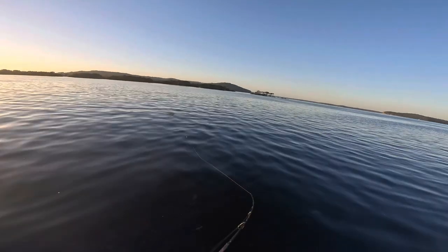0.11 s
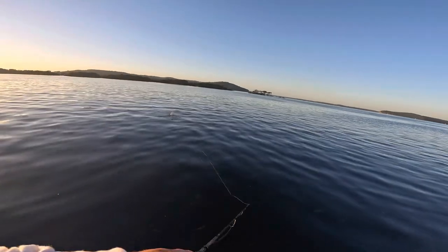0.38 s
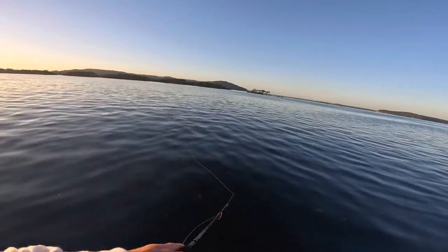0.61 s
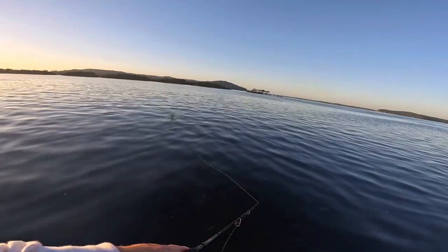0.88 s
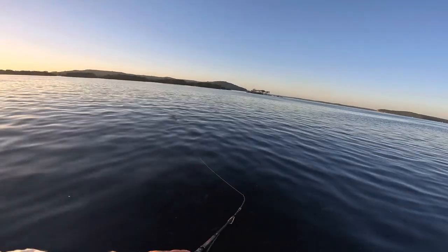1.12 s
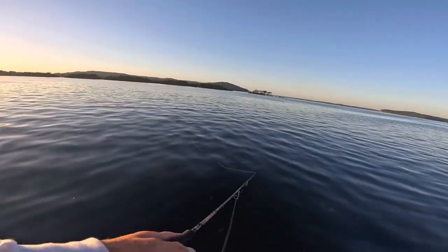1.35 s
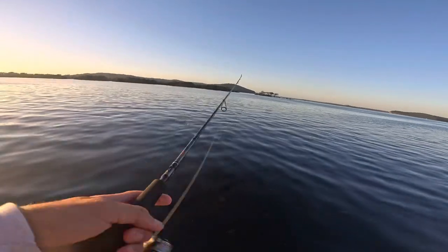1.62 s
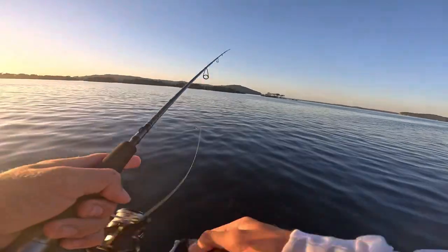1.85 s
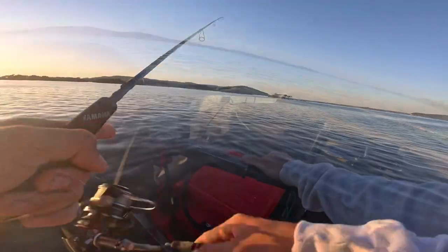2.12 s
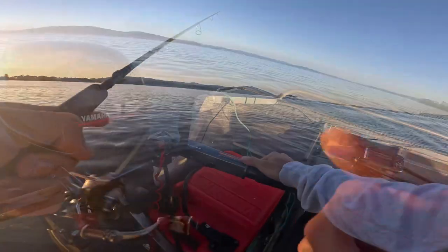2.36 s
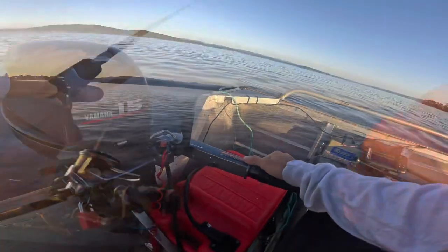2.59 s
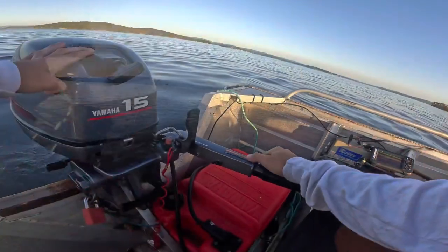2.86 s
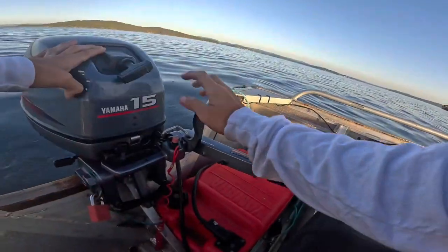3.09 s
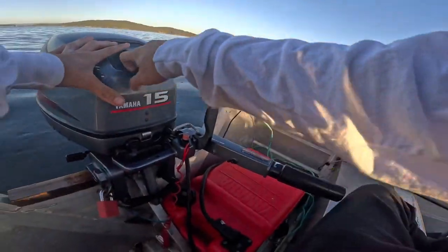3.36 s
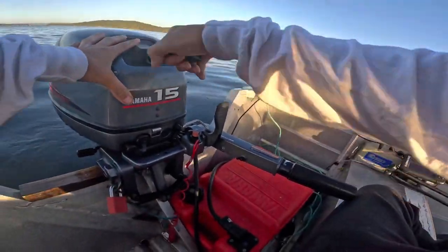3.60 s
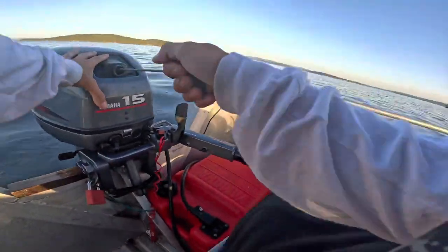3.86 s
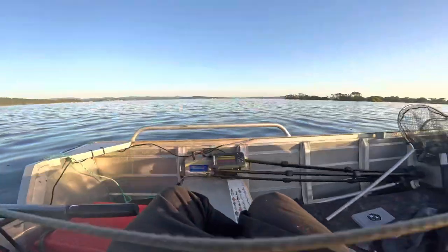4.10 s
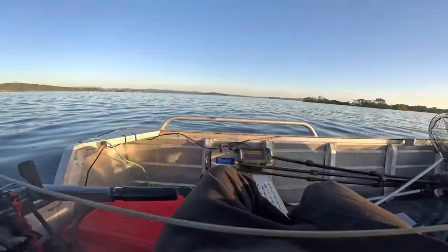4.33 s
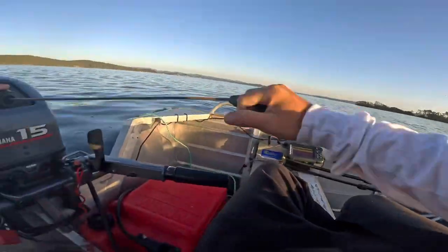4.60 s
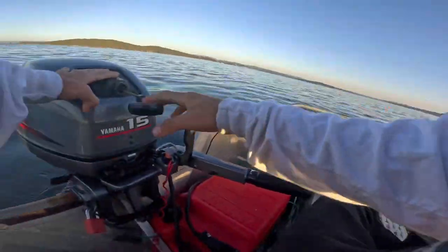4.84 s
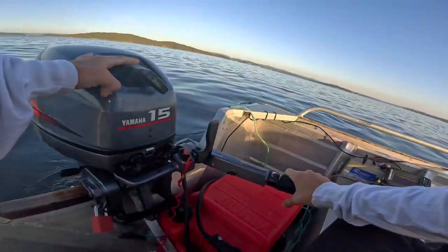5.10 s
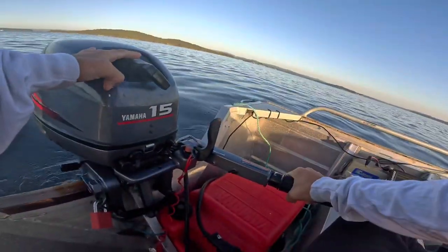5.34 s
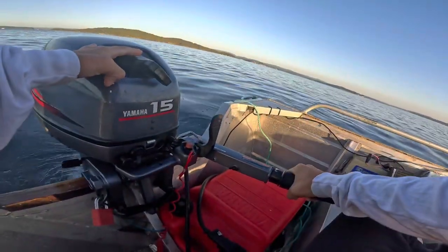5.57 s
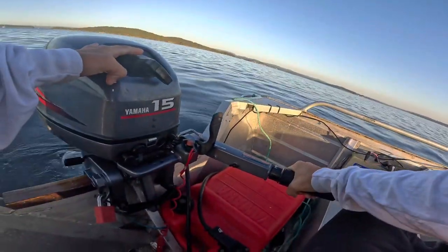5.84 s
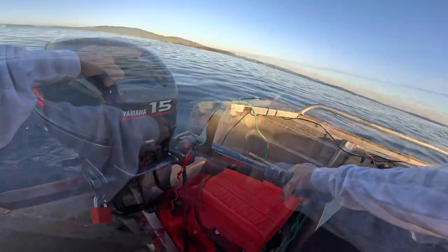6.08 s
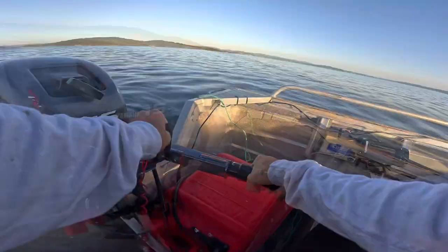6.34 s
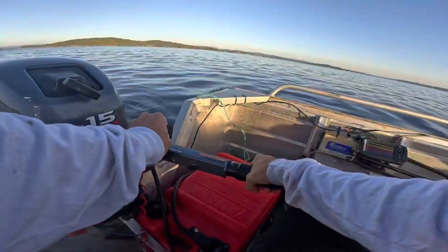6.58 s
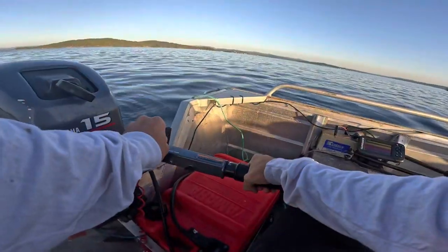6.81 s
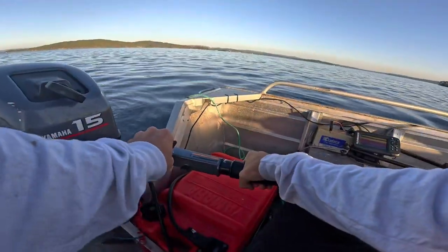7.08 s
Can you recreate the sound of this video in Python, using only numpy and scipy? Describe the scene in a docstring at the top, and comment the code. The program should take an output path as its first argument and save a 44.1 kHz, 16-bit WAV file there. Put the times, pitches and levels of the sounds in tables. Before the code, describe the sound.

Soft lapping and tackle clicks give way to a whirring starter cord and a two-stroke outboard catching, running up, settling to idle, with a final gear snap.

```python
"""A small open boat on a calm lake: noise rumbles, sleeves rustle, tackle ticks, air pockets plop at the hull.
A hand knocks on the cowl and pulls the starter cord; a two-cylinder two-stroke outboard catches,
runs up, eases off, then is heard idling. Friction and knocks are shaped noise, plops are decaying sines.
Gulps of air ring the intake's gliding resonances; noise makes the clatter, crank multiples the exhaust."""
import sys
import numpy as np
from scipy import signal
from scipy.fft import rfft, irfft
from scipy.io import wavfile

SR = 44100
rng = np.random.default_rng(int(sys.argv[2]) if len(sys.argv) > 2 else 0)


def invert_db(x):
    """Field ratio 10**(x/20) for x, a level in decibels (scalar or array-like)."""
    u = np.asarray(x, float) / 20
    return 10 ** u


def generate_wav(signal):
    """Clip the signal to [-1, 1] and save it as 16-bit WAV at the path in sys.argv[1]."""
    frames = np.transpose(np.atleast_2d(signal))
    scaled = np.clip(frames, -1, 1) * 32767
    pcm = np.round(scaled).astype(np.int16)
    wavfile.write(sys.argv[1], SR, pcm)


N = 317520


def rms_one(x):
    """Scales to rms 1."""
    return x / np.sqrt(np.mean(np.abs(x) ** 2) + 1e-20)


def in_time(rows):
    """Columns of a table after its seconds, interpolated to one value a sample."""
    s, *columns = np.transpose(rows)
    return [np.interp(np.arange(N) / SR, s, column) for column in columns]


def coloured(x, points, peaks=()):
    """Filters by a (Hz, dB) spectrum with (Hz, width Hz, dB) resonances on top."""
    hz = np.maximum(np.fft.rfftfreq(N, 1 / SR), 1)
    point_hz, point_db = np.transpose(points)
    base = invert_db(np.interp(np.log(hz), np.log(point_hz), point_db))
    boost = sum(invert_db(top_db) / (1 + (2 * (hz - at_hz) / width) ** 2) for at_hz, width, top_db in peaks)
    return irfft(rfft(x) * base * (1 + boost), N)


def drift(corner_hz):
    """Slow chance of spread 1: noise through two equal low-pass poles, computed every 40 samples."""
    r = np.exp(-2 * np.pi * corner_hz * 40 / SR)
    noise = rng.standard_normal(N // 40 + 2002)
    slow = signal.lfilter([1], [1, -2 * r, r * r], noise)[2000:]   # settled part
    return np.interp(np.arange(N) / 40, np.arange(len(slow)), rms_one(slow))


def ping(clicks, hz):
    """Clicks ring a two-pole resonance, down 60 dB in thirty cycles."""
    r, w = invert_db(-2 * hz / SR), 2 * np.pi * hz / SR
    return signal.lfilter([np.sin(w)], [1, -2 * r * np.cos(w), r * r], clicks + 1e-18)


# Rumble spectrum. Each row: Hz, density in dB per Hz.
RUMBLE_COLOUR = [(20, 1), (45, -1.5), (110, 1), (300, -9.5), (460, -22.5), (800, -60)]
# Gusts and jolts on the microphone. Each row: peak in seconds, level in dB, half length in seconds.
GUSTS = [(2.413, -38.5, 0.21), (2.86, -30.5, 0.018), (3.145, -35, 0.029), (4.347, -20.5, 0.37),
         (5.214, -18.5, 0.31), (7.04, -20, 0.12)]
CALM_AIR_DB = -41.5
BUFFET_DB, BUFFET_HZ, BUFFET_ENDS_S = -42.5, 45, 3   # deep buffeting early on
# hull level at mean exhaust level, share of the exhaust's dB swing, low edge
HULL_DB, HULL_FOLLOWS, HULL_CUT_HZ = -30, 0.75, 42


def rumble():
    """Low lumpy noise: air on the microphone, and the hull shaken by the exhaust."""
    t = np.arange(N) / SR
    gust_power = sum(invert_db(2 * db) * np.exp(-2 * ((t - s) / half_s) ** 2) for s, db, half_s in GUSTS)
    air_gain = np.sqrt(invert_db(2 * CALM_AIR_DB) + gust_power)
    exhaust_db = engine_levels()[3]
    exhaust_swing_db = exhaust_db - np.mean(ENGINE, axis=0)[2]
    hull_gain = invert_db(HULL_DB + HULL_FOLLOWS * exhaust_swing_db) * (t > CATCH_S)
    air, low = [rms_one(coloured(white, RUMBLE_COLOUR)) for white in rng.standard_normal((2, N))]
    deep = rms_one(signal.lfilter(*signal.butter(2, BUFFET_HZ, fs=SR), low))
    buffet = invert_db(BUFFET_DB) * deep * np.clip((BUFFET_ENDS_S - t) / .5, 0, 1)
    hull = hull_gain * signal.lfilter(*signal.butter(2, HULL_CUT_HZ, "high", fs=SR), low)
    return invert_db(2.65 * drift(18.2)) * (buffet + air_gain * air + hull)


# Steady friction: sleeves and line, then hand on the cowl.
# Each row: start in seconds, end in seconds, level at start in dB, level at end in dB.
SPELLS = [(0, 2.653, -62, -52.5), (3.24, 3.75, -49, -54)]
SPELL_RISE_DB_PER_S, SPELL_FALL_DB_PER_S = 173, 95.5


def spells():
    """Gain of the steady friction: each spell swells, holds a slope and dies."""
    t = np.arange(N) / SR
    gain = np.zeros(N)
    for start, end, start_db, end_db in SPELLS:
        slope_db = np.interp(t, [start, end], [start_db, end_db])
        rise_db = SPELL_RISE_DB_PER_S * np.maximum(start - t, 0)
        fall_db = SPELL_FALL_DB_PER_S * np.maximum(t - end, 0)
        gain += invert_db(slope_db - rise_db - fall_db)
    return gain


# Friction spectrum. Each row: Hz, density in dB per Hz.
RUSTLE_COLOUR = [(410, 7), (774, -3), (2080, -6.5), (6940, -16.5), (14000, -36.5)]
# Single rubs and gurgles. Each row: peak in seconds, level in dB, half length in seconds, centre in Hz.
RUBS = [(0.124, -51.5, 0.019, 2330), (0.259, -55, 0.038, 2340), (0.639, -44.5, 0.061, 433),
        (1.68, -56.5, 0.1, 2670), (1.872, -50.5, 0.081, 960), (2.471, -46, 0.05, 1060),
        (3.283, -45.5, 0.02, 1070), (4.141, -33.5, 0.014, 3470), (4.263, -31.5, 0.053, 1500)]


def rustle():
    """Cloth and line friction: patchy noise with fine snags, and single rubs round their own pitch."""
    snag_gain = 1 + (rng.random(N) < .01) * 3.6 * rng.exponential(1, N)
    snags = snag_gain * rng.standard_normal(N)
    even = rms_one(coloured(snags, RUSTLE_COLOUR, [(2490, 29, 4.1)]))
    dull = signal.lfilter(*signal.butter(2, 2000, fs=SR), even)
    patchy = invert_db(3.5 * drift(24.0)) * dull + invert_db(2.0 * drift(51.0)) * (even - dull)
    out = spells() * patchy
    t = np.arange(-6000, 6000) / SR
    scratchy = snags[::-1] * invert_db(2.5 * drift(60.0))   # fibres catch and let go
    for s, db, half_s, hz in RUBS:
        at = slice(max(round(s * SR) - 6000, 0), round(s * SR) + 6000)
        band = signal.lfilter(*signal.butter(2, [.6 * hz, 1.7 * hz], "band", fs=SR), scratchy[at])
        out[at] += invert_db(db) * rms_one(band) * np.exp(-(t[-len(band):] / half_s) ** 2)
    return out


FAINT_TICKS_PER_S, FAINT_TICK_DB, REELING_ENDS_S = 55, -60, 2.7   # rate and level before random swings


def faint_ticks():
    """Line and reel tick at random in clumps, each a brief ring at one of eight pitches."""
    reeling = np.arange(N) < REELING_ENDS_S * SR
    rate_per_s = FAINT_TICKS_PER_S * invert_db(5.0 * drift(3.7)) * reeling
    tick_db = FAINT_TICK_DB + 3.7 * np.minimum(rng.exponential(1, N), 3)
    clicks = (rng.random(N) < rate_per_s / SR) * invert_db(tick_db)
    dealt, out = rng.integers(0, 8, N), np.zeros(N)
    for k, hz in enumerate(np.geomspace(2200, 9000, 8)):
        out += ping(clicks * (dealt == k), hz)
    return out


# Purrs of the reel's ratchet. Each row: start in seconds, end in seconds, ring in Hz.
RATCHET = [(.64, .715, 3400), (1.975, 2.105, 6600)]
RATCHET_PER_S, RATCHET_DB = 95, -52


def ratchet():
    """A pawl skips over teeth: nearly even clicks, each ringing briefly."""
    out = np.zeros(N)
    for start, end, hz in RATCHET:
        clicks, s = np.zeros(N), np.arange(start, end, 1 / RATCHET_PER_S)
        chance = rng.standard_normal((len(s), 2))
        at = ((s + .001 * chance[:, 0]) * SR).astype(int)
        clicks[at] = invert_db(RATCHET_DB + 3 * chance[:, 1])
        out += ping(clicks, hz)
    return out


# Air pockets in the water at the hull, lastly in the intake on the first compression.
# Each row: start in seconds, level in dB before shaking, settled pitch in Hz, t60 in seconds.
PLOPS = [(0.061, -43, 528, 0.33), (.379, -42.5, 783, 0.11), (.428, -26, 265.7, 0.16),
         (0.602, -25, 293, 0.29), (0.747, -42.5, 2330, .12), (1.117, -50.5, 1110, 0.39),
         (1.052, -37, 864, 0.22), (1.13, -30, 171, 0.24), (1.18, -43.5, 611, 0.19),
         (3.282, -30, 967.5, 0.18), (3.927, -12, 368, 0.13)]


def plops():
    """A trapped pocket of air rings, sagging a little in pitch and shaken by the water round it."""
    out, t = np.zeros(N), np.arange(12000) / SR
    shake = invert_db(2.15 * drift(67.0))
    for s, db, hz, t60 in PLOPS:
        phase = 2 * np.pi * np.cumsum(hz * (1 + 0.0895 * np.exp(-t / 0.027))) / SR
        envelope = invert_db(db - 60 * t / t60) * (1 - np.exp(-t / 0.0034))
        out[round(s * SR):][:12000] += envelope * np.sin(phase)
    return out * rms_one(shake + 0.8 * drift(220.0))


# Ticks of reel and tackle. Each row: start in seconds, relative peak in dB, centre in Hz.
TICKS = [(0.284, -36.5, 4500), (0.967, -39, 5200), (1.012, -39, 7600), (1.363, -45, 5700),
         (2.203, -24, 3020), (2.2645, -31, 2240), (2.312, -32, 5500), (2.5096, -31, 1780)]
# Knocks of hands, starter and gear lever on the motor.
# Each row: start in seconds, relative tick peak in dB, tick centre in Hz, relative knock level in dB.
KNOCKS = [(3.4831, -44, 1440, -26), (3.536, -33.5, 2280, -38.5), (3.6123, -56, 1680, -32),
          (3.72, -60, 1500, -29), (3.768, -23.5, 2230, -23), (3.8691, -21, 1910, -19),
          (4.6434, -23, 3870, -34), (4.7607, -26, 3960, -24), (4.9455, -14.5, 2340, -16.5),
          (5.278, -20, 3450, -44), (6.9605, -25, 3460, -36), (7.008, -22, 1950, -32),
          (6.974, -17, 2370, -37)]
# Hull and cowl modes. Each row: nominal Hz, nominal level in dB, t60 in seconds.
KNOCK_MODES = [(272, 10, 0.034), (528, 4, 0.053), (732, 1, 0.038), (1022, 6, 0.024)]
TICK_KNOCK_DB = -20.5   # what a tick passes on to the hull
TICK_TAIL_DB, KNOCK_TAIL_DB = -28, -10   # tackle is dry, the motor rattles on


def taps():
    """Each tap is a dying burst round its own pitch and a push into the hull and cowl modes."""
    out, t = np.zeros(N + 8000), np.arange(8000) / SR
    rows = [(s, db, hz, db + TICK_KNOCK_DB, TICK_TAIL_DB) for s, db, hz in TICKS]
    rows += [(*row, KNOCK_TAIL_DB) for row in KNOCKS]
    thud_band = signal.butter(2, [220, 1300], "band", fs=SR, output="sos")
    chance = rng.standard_normal((len(rows), 8000))
    for (s, tick_db, hz, knock_db, tail_db), noise in zip(rows, chance):
        band = signal.butter(3, [.5 * hz, min(2 * hz, 15000)], "band", fs=SR, output="sos")
        decay = invert_db(-60 * t / 0.0077) + invert_db(tail_db - 60 * t * hz / 183.0)   # burst and tail
        tick = signal.sosfilt(band, noise) * decay * (1 - np.exp(-t / 0.0012))
        knock = rms_one(signal.sosfilt(thud_band, noise)) * invert_db(-60 * t / .16)   # dull thud
        for k, (mode_hz, db, t60) in enumerate(KNOCK_MODES):
            detuned_hz = mode_hz * (1 + 0.087 * noise[k + 9])
            knock += invert_db(db + 0.74 * noise[k] - 60 * t / t60) * np.sin(2 * np.pi * detuned_hz * t)
        at = slice(round(s * SR), round(s * SR) + 8000)
        out[at] += invert_db(tick_db - 2.5) * tick / np.abs(tick).max()
        out[at] += invert_db(knock_db - 1.5) * knock * (1 - np.exp(-t / .002))
    return out[:N]


# Cord spectrum. Each row: Hz, density in dB per Hz.
CORD_COLOUR = [(1100, 5), (3400, -10.5), (7500, -13.5), (15000, -36)]
# Rasp of the cord as it runs out. Each row: seconds, level in dB.
CORD_PULL = [(3.76, -80), (3.775, -43.5), (4.21, -33), (4.22, -25.5), (4.27, -26), (4.38, -80.5)]


def cord():
    """The starter cord whirrs off its reel: noise with a flickering level."""
    rasp = rms_one(coloured(rng.standard_normal(N), CORD_COLOUR))
    return invert_db(in_time(CORD_PULL)[0] + 2.5 * drift(70.0)) * rasp


# Linkage resonances. Each row: Hz, width in Hz, boost in dB.
LEVER_PEAKS = [(3290, 540, 8), (5700, 420, 14), (6900, 590, 22)]
LEVER_S, LEVER_DB, LEVER_T60_S = 6.9805, -13.5, 0.029   # the gear lever snaps into its notch
GEAR_S, GEAR_DB, GEAR_HZ, GEAR_T60_S = 7.009, -14, 940, .11   # the gear dog drops in


def lever():
    """A sharp noise snap ringing the linkage, then the clunk of the gear, a decaying sine."""
    t = np.arange(N) / SR
    colour = [(1500, -26), (2200, 3.5), (14000, -19)]
    scrape = rms_one(coloured(rng.standard_normal(N), colour, LEVER_PEAKS))
    slope = np.where(t < LEVER_S, 10, 1)   # rises ten times as fast as it falls
    snap = invert_db(LEVER_DB - 60 * abs(t - LEVER_S) / LEVER_T60_S * slope) * scrape
    since = np.maximum(t - GEAR_S, 0)
    return snap + invert_db(GEAR_DB - 60 * since / GEAR_T60_S) * np.sin(2 * np.pi * GEAR_HZ * since)


# Crank speed. Each row: seconds, turns per second.
SPEED = [(4.0, 7.5), (4.57, 14.8), (4.81, 18.8), (5.2, 28.9), (5.45, 32.7), (5.65, 30.8), (6.16, 24.6),
         (6.21, 16.1), (7.2, 15.2)]
# Engine levels. Each row: seconds, intake in dB, exhaust in dB.
ENGINE = [(4.05, -17, -46), (4.2, -20, -48), (4.5, -20.5, -29), (4.9, -20.5, -33.5), (5.15, -21, -25),
          (5.6, -28.5, -21.5), (6.05, -30.5, -26), (6.22, -30.5, -31), (6.45, -24.5, -25),
          (7.2, -26, -30.5)]


def engine_levels():
    """Crank speed, its doublings above 20 turns per s, intake dB and exhaust dB."""
    speed, = in_time(SPEED)
    intake_db, exhaust_db = in_time(ENGINE)
    return speed, np.log2(speed / 20), intake_db, exhaust_db


# Exhaust orders: multiples of crank speed, and their relative levels in dB.
ORDERS_HEARD = [4, 5, 8]
ORDER_DB = [0., -5, 1.]
# Exhaust pipe resonance: Hz, width in Hz.
EXHAUST_PIPE = (114, 48)
FIRING_DB, FIRING_DB_PER_DOUBLING = -6.5, 9   # firing tone against the exhaust


def exhaust(turns, speed, doublings):
    """Wavering crank orders weighted by the pipe resonance, plus a tone at two firings a turn."""
    pipe_hz, width_hz = EXHAUST_PIPE
    out = invert_db(FIRING_DB + FIRING_DB_PER_DOUBLING * doublings) * np.sin(4 * np.pi * turns)
    for order, db in zip(ORDERS_HEARD, ORDER_DB):
        resonance = 1 / (1 + ((order * speed - pipe_hz) / width_hz) ** 2)
        out += invert_db(db + 1.2 * drift(2.9)) * np.sin(2 * np.pi * order * turns + order) * resonance
    return out


# Clatter spectrum. Each row: Hz, density in dB per Hz.
CLATTER_COLOUR = [(450, -10.5), (850, 4), (1400, -11.5), (4500, -19.5), (8500, -29), (15500, -57.5)]
# Cowl resonances. Each row: Hz, width in Hz, boost in dB.
COWL_PEAKS = [(613.7, 24, 9.5), (1102, 12, 11.5), (1520, 14, 8), (3450, 200, -4)]
SLAP_DB, SLAP_DB_PER_DOUBLING, SLAP_DECAY_S = 4, 4, .004


def clatter(turns, speed, doublings, firing):
    """Cowl noise shaken by each firing; a piston slaps once a turn, unevenly, harder at speed."""
    gate = invert_db(1.3 * firing + 1.0 * drift(25.0))
    force = rng.random(400)[turns.astype(int) % 400] ** 2
    force = force * invert_db(SLAP_DB + SLAP_DB_PER_DOUBLING * doublings)
    since_slap_s = ((turns - FIRING_ANGLE_TURNS) % 1) / speed
    gate = gate * (1 + force * np.exp(-since_slap_s / SLAP_DECAY_S))
    return rms_one(coloured(gate * rng.standard_normal(N), CLATTER_COLOUR, COWL_PEAKS))


# Cowl resonances rung at idle. Each row: Hz, width in Hz, boost in dB.
IDLE_PINGS = [(2124, 94, 36)]
IDLE_PING_DB = -53.5


def idle_pings(idle, firing):
    """At idle the cowl pings at each firing: noise pulses through narrow resonances."""
    pulses = invert_db(10 * firing) * rng.standard_normal(N)
    return invert_db(IDLE_PING_DB) * idle * rms_one(coloured(pulses, CLATTER_COLOUR, IDLE_PINGS))


HONK_EVENING = .52   # share of the honk's swing that the narrow intake flattens


def honk(turns, angle, speed, start_hz, end_hz, width_hz, second_db, turbulence_db):
    """Two gulps of air a turn ring a resonance whose pitch climbs through the turn."""
    half_turns = np.floor(2 * (turns - angle))
    gulp = np.flatnonzero(np.diff(half_turns)) + 1
    which = half_turns[gulp].astype(int)
    gulp_db = second_db * (which % 2) + 1.5 * rng.standard_normal(400)[which % 400]
    drive = np.zeros(N)
    drive[gulp] = invert_db(gulp_db) * np.sqrt(SR / speed[gulp] / 2)   # even power at any speed
    drive += invert_db(turbulence_db) * rng.standard_normal(N)
    pitch_hz = start_hz + (end_hz - start_hz) * np.sqrt(turns % 1)
    spin = np.exp(2j * np.pi * np.cumsum(pitch_hz) / SR)
    r = np.exp(-2 * np.pi * width_hz / SR)
    # shifted down by the moving pitch, the resonance is a double low-pass
    swell = signal.lfilter([1], [1, -2 * r, r * r], drive / spin)
    ringing = np.real(spin * swell) / (np.abs(swell) + 1e-9) ** HONK_EVENING
    port_open = np.abs(np.sin(np.pi * (turns - angle))) ** .5   # shut for a moment once a turn
    return rms_one(port_open * ringing)


# Intake resonances, rising as the piston closes the crankcase. Each: Hz at start of turn (high one:
# before the idle lift), Hz at end, pole width in Hz, second cylinder in dB, turbulence in dB.
LOW_HONK = (379.5, 388, 19, -7, -9.5)
HIGH_HONK = (640, 780, 22, -4, -7)
# Lag of the low honk, changing through the scene. Each row: seconds, crank angle in turns.
LOW_GULP = [(4.9, .36), (5.3, .64), (6.15, .64), (6.25, .35), (6.95, .36), (7.05, .57)]
IDLE_HONK_LIFT_HZ, IDLE_GULP_TURNS, IDLE_CHOKE_DB = 50, .3, -9


def intake(turns, speed, intake_db, high_db, idle):
    """Low and high honks; at idle the high one starts higher and is choked after a short gulp."""
    low = honk(turns, *in_time(LOW_GULP), speed, *LOW_HONK)
    start_hz, *shape = HIGH_HONK
    high = honk(turns, 0, speed, start_hz + IDLE_HONK_LIFT_HZ * idle, *shape)
    choke = idle * np.clip(10 * (turns % 1 - IDLE_GULP_TURNS) + 1, 0, 1)
    return invert_db(intake_db) * low + invert_db(high_db) * high * invert_db(IDLE_CHOKE_DB * choke)


# Layer laws at mean intake level and 20 turns per s.
# Each: level in dB, share of the intake's dB swing, dB per doubling of speed.
HIGH_HONK_LAW = (-28.5, 1.42, 1.7)
CLATTER_LAW = (-34.5, 0.59, 4.2)
CRANK_AT_4_S_TURNS, FIRING_ANGLE_TURNS = .62, .18
CATCH_S, CATCH_RISE_S, IDLE_FROM_S = 4.05, 0.0058, 6.2   # first firing, its rise, heard idling from here
CRANKING_DB_PER_S = 57   # rise of the clatter before the catch, as the cord spins the crank up


def engine():
    """One crank angle drives the intake honks, the clatter through the cowl and the exhaust orders."""
    t = np.arange(N) / SR
    speed, doublings, intake_db, exhaust_db = engine_levels()
    turns = CRANK_AT_4_S_TURNS + np.cumsum(speed) / SR - np.sum(speed[:4 * SR]) / SR
    running = np.clip(1 - (CATCH_S - t) / CATCH_RISE_S, 0, 1)
    idle = t > IDLE_FROM_S
    firing = np.cos(4 * np.pi * (turns - FIRING_ANGLE_TURNS))
    swing_db = intake_db - np.mean(ENGINE, axis=0)[1]
    high_db, clatter_db = [db + share * swing_db + per_doubling * doublings
                           for db, share, per_doubling in (HIGH_HONK_LAW, CLATTER_LAW)]
    clatter_db = clatter_db - CRANKING_DB_PER_S * np.maximum(CATCH_S - t, 0)
    fired = intake(turns, speed, intake_db, high_db, idle) + idle_pings(idle, firing)
    fired = fired + invert_db(exhaust_db) * exhaust(turns, speed, doublings)
    return running * fired + invert_db(clatter_db) * clatter(turns, speed, doublings, firing)


# Treble level. Each row: seconds, gain in dB reached above a 4.5 to 6 kHz crossover.
TREBLE = [(2.9, 4), (3.2, -6.5), (4.5, -10.5), (6.0, -5), (6.4, 0.5)]
# Stereo placement and width through the scene. Each row: seconds, left minus right in dB, side level in dB.
STEREO = [(0, 0.7, -9.5), (1.9, 1, -12.5), (2.2, -4.5, -6.5), (3.0, 0, -43), (6.0, 0, -40.5), (6.5, 2, -10)]
# Side signal spectrum. Each row: Hz, gain in dB.
SIDE_COLOUR = [(25, 5.5), (400, -4), (12000, 7)]


def scene():
    """All sources, shaded and panned; the two microphone ports differ by a wavering share."""
    mid = rumble() + rustle() + faint_ticks() + ratchet() + plops() + taps() + cord() + engine()
    treble = mid - coloured(mid, [(4500, 0), (6000, -30)])
    mid = mid + (invert_db(in_time(TREBLE)[0]) - 1) * treble
    pan_db, side_db = in_time(STEREO)
    side = invert_db(side_db) * coloured(mid * drift(24.0), SIDE_COLOUR)
    left = mid * invert_db(pan_db / 2) + side
    right = mid * invert_db(-pan_db / 2) - side
    return np.array([left, right]) + lever()   # the lever is central


def low_pass(x):
    """Removes everything above the highest recorded frequency."""
    return signal.sosfilt(signal.butter(12, 15440, fs=SR, output="sos"), x)


# Microphone response. Each row: Hz, gain in dB.
MICROPHONE = [(8000, 0.5), (12000, 0.5), (15500, -18)]


def record(dry):
    """The microphone rolls off above 12 kHz and rounds the peaks."""
    ceiling = .8
    heard = np.array([coloured(channel, MICROPHONE) for channel in dry])
    mix = ceiling * np.tanh(heard / ceiling)
    return low_pass(mix)


dry = scene()
out = record(dry)
generate_wav(out)
```